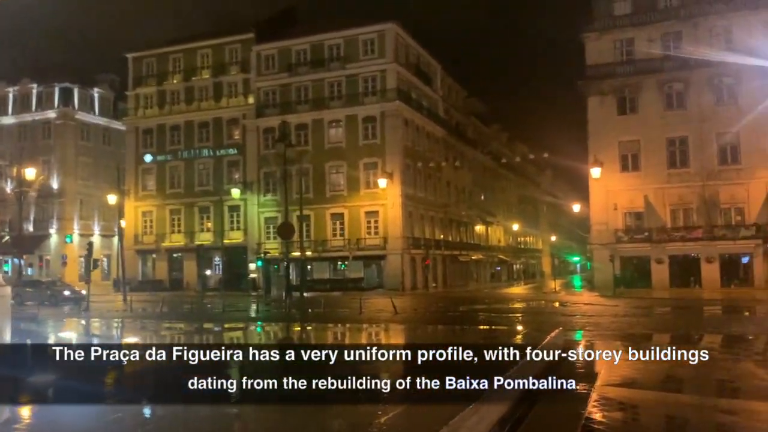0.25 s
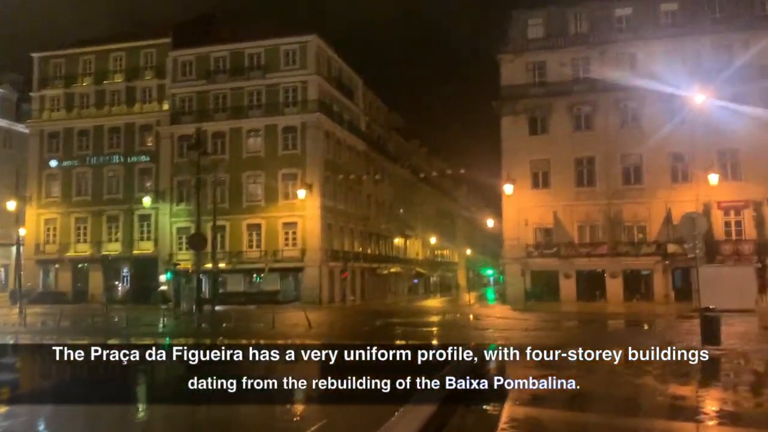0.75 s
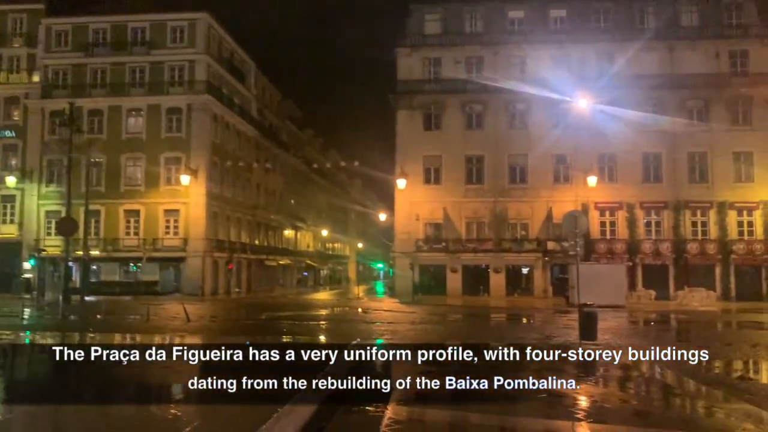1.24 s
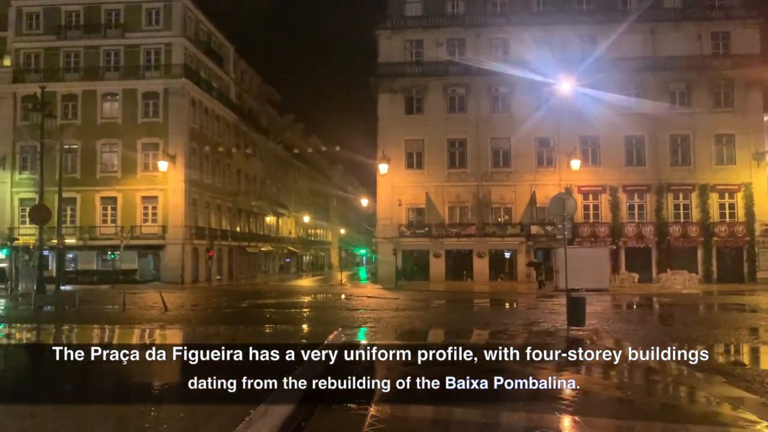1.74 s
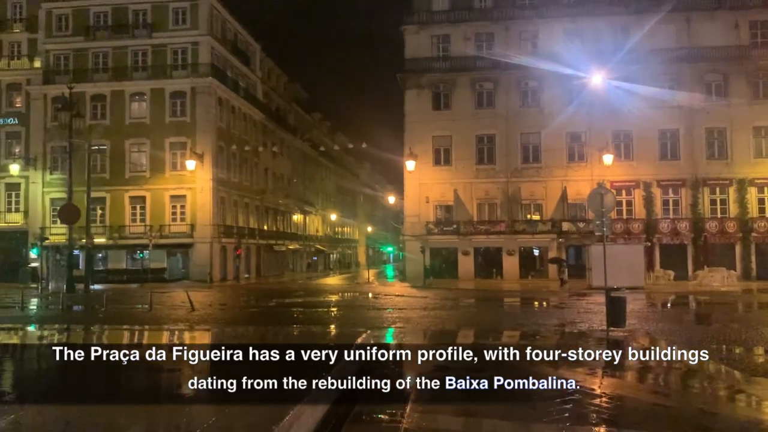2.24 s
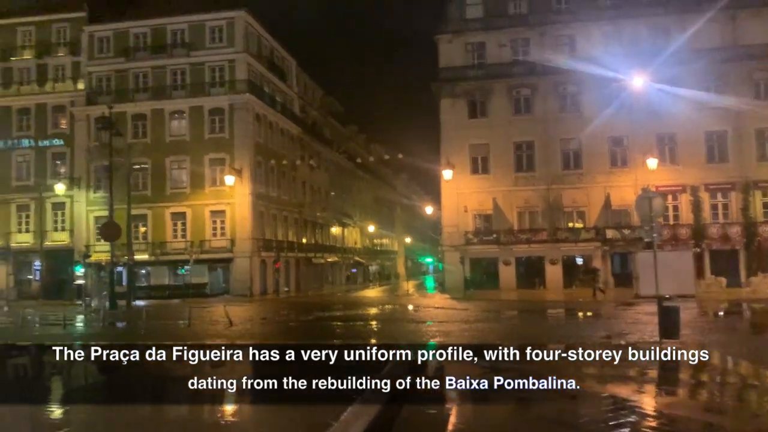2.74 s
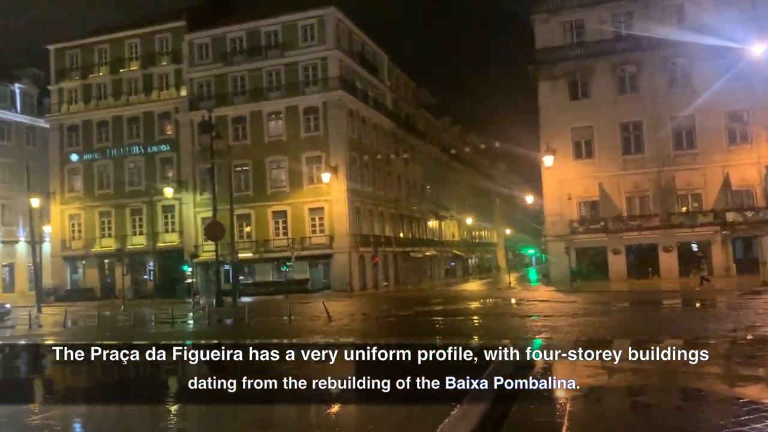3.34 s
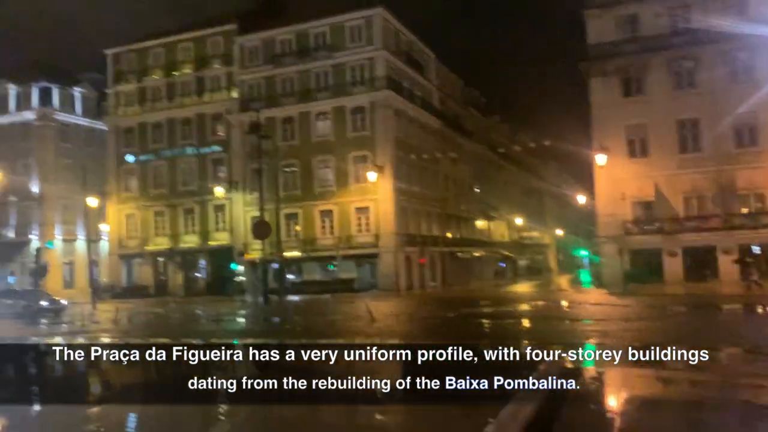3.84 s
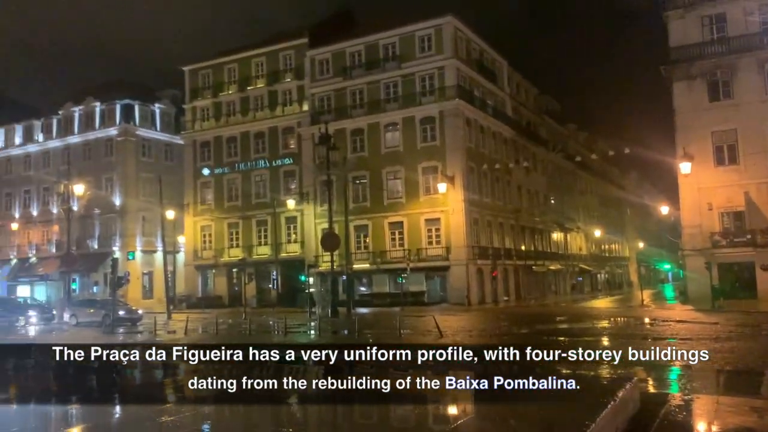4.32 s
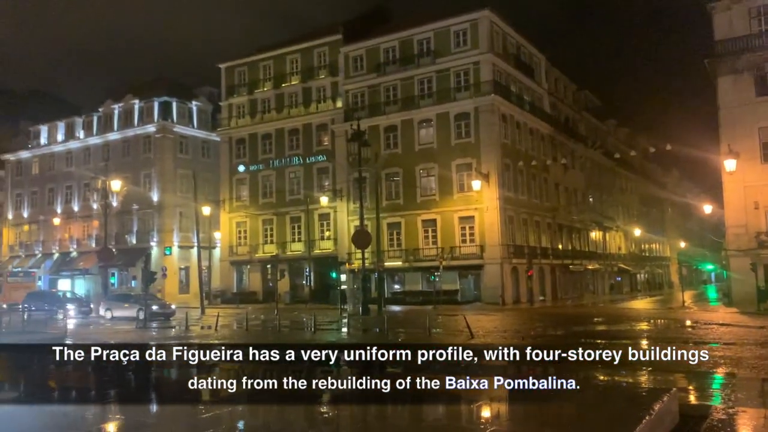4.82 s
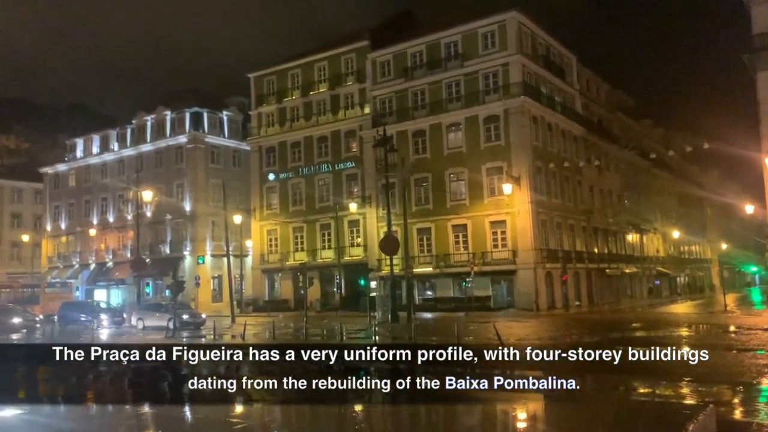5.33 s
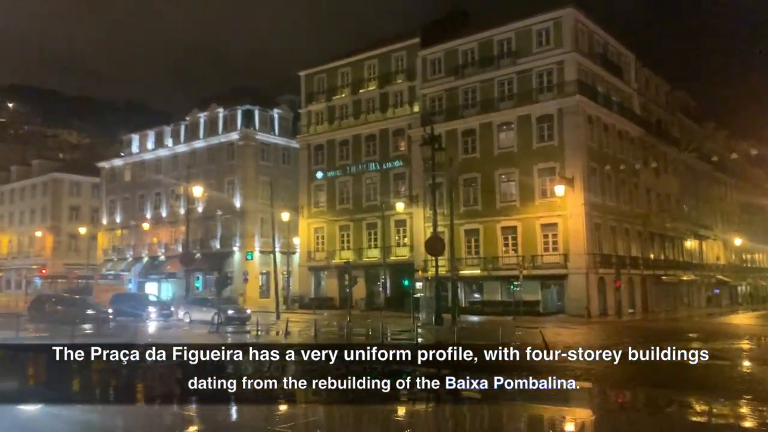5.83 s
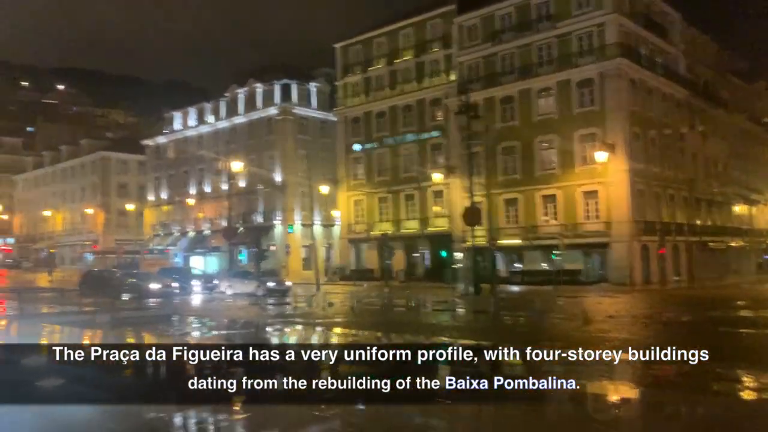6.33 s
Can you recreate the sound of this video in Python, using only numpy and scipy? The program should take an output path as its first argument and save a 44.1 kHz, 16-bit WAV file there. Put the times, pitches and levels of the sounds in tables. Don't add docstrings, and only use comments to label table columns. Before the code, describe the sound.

A wet city square at night, heard through a small handheld stereo microphone in the wind. Low, bassy buffets come in separate uneven pushes: modest in the first second, stronger from about 1.6 to 3.3, easing around 3.5 to 4, then building to the heaviest thumps at 5.3 and 5.8 before falling away. Beneath lies steady, diffuse traffic rumble with soft tyre roar and brief tread hums. A distant heavy engine pulls away, its low drone rising until it fades after 5.5. Wet paving gives an even, quiet hiss, with fizzing spurts densest from 2.6 to 3.3. Tiny bright drops tick throughout, sharpest near 2; dull taps hit the housing at 0.8 and 4.5 and cluster around 6. A very faint motor whine swells between 5 and 6, then a tiny brake squeal at 6.2. Thin electronic hiss and slight noise-suppression speckle remain.

```python
import sys
import numpy as np
from scipy import signal
from scipy.fft import rfft, irfft, next_fast_len
from scipy.io import wavfile
from scipy.ndimage import uniform_filter1d, map_coordinates

SR = 44100
rng = np.random.default_rng(int(sys.argv[2]) if len(sys.argv) > 2 else 0)


def to_wav(s):
    ch = np.atleast_2d(s).T
    pcm = np.round(np.clip(ch, -1, 1) * 32767)
    wavfile.write(sys.argv[1], SR, pcm.astype(np.int16))


def volts_from_decibels(level):
    exponent = np.asarray(level, float) / 20
    return 10 ** exponent


N = 289737

# t/s, engine level/dB, tyre level/dB
TRAFFIC_LEVELS = [(0, -36.5, -45.5), (.3, -34.5, -47), (.8, -35, -44), (1.3, -33, -47.5),
                  (1.75, -34.5, -47), (2.3, -32.5, -47.5), (3, -32, -46.5), (3.6, -34.5, -47.5),
                  (4.3, -33, -45.5), (4.9, -33, -46), (5.5, -33, -45.5), (5.85, -31, -45), (6.15, -34, -46),
                  (6.57, -32, -45.5)]
TYRES_MEAN_DB = -45.5


def unit(x):
    return x / np.sqrt(np.mean(x ** 2) + 1e-20)


def along(points, hz):
    f, v = np.transpose(points)
    return np.interp(np.log(hz + 1), np.log(f + 1), v)


def curves(rows):
    s, *cols = np.transpose(rows)
    return [np.interp(np.arange(N) / SR, s, c) for c in cols]


def wobble(rate):
    knots = rng.standard_normal(int(N * rate / SR) + 4)
    return map_coordinates(knots, [np.arange(N) * rate / SR])


def filtered(x, response):
    m = next_fast_len(x.shape[-1] + 8192)
    spectrum = rfft(x, m) * response(np.fft.rfftfreq(m, 1 / SR))
    return irfft(spectrum, m)[..., :x.shape[-1]]


def band(hz, lo_hz, hi_hz):
    return ((1 + (lo_hz / (hz + 1)) ** 10) * (1 + (hz / hi_hz) ** 10)) ** -.5


def steady(x, size):
    power = np.abs(uniform_filter1d(x ** 2, size))
    return x / np.sqrt(power + 0.16 * np.mean(x ** 2))


def swells(rows, rise_s, fall_s):
    start, length, db = np.transpose(rows)[:3, :, None]
    t = np.arange(N) / SR
    rise = (t - start) / rise_s
    fall = (start + length - t) / fall_s + 1
    return (volts_from_decibels(db) * np.clip(np.minimum(rise, fall), 0, 1)) ** 2


def panned(db):
    return volts_from_decibels(np.array([db / 2, -db / 2]))


def patchy_noise(patchy_db):
    z = signal.stft(rng.standard_normal((2, N)), nperseg=512)[2]
    patches = uniform_filter1d(rng.standard_normal(z.shape[1:]), size=8, axis=0)
    patches = uniform_filter1d(patches, size=6, axis=1)
    return signal.istft(z * volts_from_decibels(patchy_db * unit(patches)), nperseg=512)[1][:, :N]


def at_ports(pair, ports):
    at, alike, lead, pan_db = np.transpose(ports)
    turn = lambda hz: np.arccos(np.clip(np.interp(hz, at, alike), 0, 1)) / 2
    mid, side = filtered(pair, lambda hz: np.array([np.cos(turn(hz)), np.sin(turn(hz))]))
    delay = lambda hz: np.exp(.5j * np.outer([1, -1], np.interp(hz, at, lead)))
    lean = lambda hz: delay(hz) * panned(np.interp(hz, at, pan_db))
    return filtered(np.array([mid + side, mid - side]), lean)


def wind():
    # start/s, length/s, level/dB, flutter (upper rumble over the buffet)/dB
    buffets = [(-0.02, 0.17, -33.5, -1), (0.38, 0.08, -39.5, -3.5), (0.56, 0.19, -33.5, -6),
               (0.826, 0.4, -33.5, 0), (1.116, 0.25, -29.5, -12), (1.446, 0.11, -31, -5.5),
               (1.598, 0.22, -28, -2), (1.79, 0.11, -23.5, -4), (1.896, 0.17, -28.5, -6),
               (2.14, 0.12, -35, -9.5), (2.294, 0.14, -23, -3), (2.454, 0.15, -27.5, -5),
               (2.68, 0.12, -33, -4.5), (2.9, 0.091, -23.5, -3.5), (2.973, 0.21, -28.5, -4),
               (3.203, 0.081, -24, -6), (3.46, 0.31, -32.5, -6), (3.63, 0.083, -35.5, 1.5),
               (3.88, 0.2, -35, -2), (4.193, 0.25, -27.5, -2), (4.487, 0.236, -27, -4),
               (4.783, 0.12, -24.5, -2), (4.94, 0.31, -27.5, -4.5), (5.16, 0.15, -27, -7),
               (5.302, 0.1, -17, 0.5), (5.43, 0.48, -24, -6), (5.79, 0.09, -18.0, 2.5),
               (5.897, 0.15, -24.5, -3.5), (6.103, 0.25, -27.0, -5), (6.38, 0.11, -37, -6)]
    # f/Hz, density/dB per Hz
    eddy_spectrum = [(15, -27), (28, -9.5), (45, 7.5), (65, 13), (100, 7.5), (135, 3), (220, -32),
                     (500, -67), (900, -120)]
    calm_db, calm_flutter_db = -49, -9.5
    power, calm = swells(buffets, rise_s=0.049, fall_s=0.062), volts_from_decibels(calm_db) ** 2
    total = power.sum(axis=0) + calm
    flutter_db = (np.transpose(buffets)[3] @ power + calm_flutter_db * calm) / total
    eddies = filtered(rng.standard_normal((2, N)), lambda hz: volts_from_decibels(along(eddy_spectrum, hz)))
    flutter = filtered(eddies, lambda hz: band(hz, 90, SR))
    shared, own = steady(eddies + (volts_from_decibels(flutter_db) - 1) * flutter, size=2200)
    own = own * volts_from_decibels(-7.5 + 2 * wobble(5))
    pressure = volts_from_decibels(1.0) * np.sqrt(total) * np.array([shared + own, shared - own])
    return filtered(pressure, lambda hz: band(hz, 23, 400))


def street():
    # f/Hz, density/dB per Hz
    street_spectrum = [(20, -27), (40, -5), (70, -6), (110, 3.5), (170, -1), (320, -5), (400, -9),
                       (480, -14), (640, -13), (900, -16.5), (1080, -14), (1180, -15), (1320, -21),
                       (1600, -21.5)]
    # f/Hz, likeness/0-1, left lead/rad, left-right/dB
    low_ports = [(60, .3, 0, 0), (90, .4, 1.5, 0), (130, .9, 1.1, 0), (180, .97, .7, 0), (320, .85, 1.2, 0),
                 (450, .4, 2.7, .5), (780, .68, 2.9, 2), (950, .45, 3, 2), (1080, .4, 2, 1.5),
                 (1250, .35, 3, 1), (1400, .5, 3.2, 0)]
    # start/s, length/s, level/dB
    passes = [(.4, 0.1, -47), (2.6, 0.65, -51), (3.3, 0.28, -47.5), (3.77, .2, -47), (4.1, 0.16, -47.5),
              (4.45, 0.19, -49.5), (4.75, .3, -49), (5.15, 0.26, -44), (5.55, 0.22, -48), (5.9, 0.07, -45),
              (6.25, 0.22, -49)]
    roar_db, tread_db = -40, -46
    roar_grows, tread_grows = 0.45, 2.46
    engines_db, tyres_db = curves(TRAFFIC_LEVELS)
    near_db = tyres_db - TYRES_MEAN_DB
    field = at_ports(patchy_noise(patchy_db=1.8), low_ports)
    field = filtered(field, lambda hz: volts_from_decibels(along(street_spectrum, hz)))
    part = lambda lo_hz, hi_hz: unit(filtered(field, lambda hz: band(hz, lo_hz, hi_hz) ** 2))
    rumble = steady(part(15, 440), size=4000)
    roar, tread = part(410, 950), part(940, 1300)
    passing = swells(passes, rise_s=0.071, fall_s=0.061).sum(axis=0)
    hum = np.sqrt(volts_from_decibels(tread_db + tread_grows * near_db) ** 2 + passing)
    roar_level = volts_from_decibels(roar_db + roar_grows * near_db + wobble(8))
    return volts_from_decibels(engines_db + 4.5) * rumble + roar_level * roar + hum * tread


def bus():
    # t/s, firing rate/Hz, level/dB
    pull_away = [(0, 56, -41.5), (.45, 52.8, -37), (1.25, 54, -38.5), (1.75, 56.5, -43.5),
                 (2.35, 60.5, -35), (3, 65, -38), (4.1, 71.5, -40), (4.45, 75, -44), (5.1, 81, -36.5),
                 (5.5, 83, -46), (6.57, 84, -55)]
    # f/Hz, gain/dB
    exhaust_pipe = [(50, -20), (105, -7.5), (135, 0.5), (165, -0.5), (185, -3), (215, -2), (250, -19.5)]
    lead_rad = .8
    firing_hz, db = curves(pull_away)
    firing_hz = firing_hz + 0.399 * wobble(6)
    turns = 2 * np.pi * np.cumsum(firing_hz) / SR
    lean = np.array([[.5], [-.5]]) * lead_rad
    engine = np.zeros((2, N))
    for multiple in (2, 3):
        strength = volts_from_decibels(along(exhaust_pipe, multiple * firing_hz) + 1.5 * wobble(5))
        engine += strength * np.sin(multiple * turns + lean)
    return volts_from_decibels(db + 3) * engine


def spray():
    # f/Hz, density/dB per Hz
    wet_spectrum = [(1200, 3), (1500, 1), (1800, -1), (2100, -2), (2450, -6.5), (3200, -8), (3700, -8),
                    (4500, -8.5), (5200, -10.5), (6000, -13), (6800, -14.5), (8000, -21), (9200, -35.5),
                    (10500, -62)]
    # f/Hz, likeness/0-1, left lead/rad, left-right/dB
    high_ports = [(1400, .5, 3.3, 0), (1850, .15, 3.6, .5), (2100, .45, 6.1, .5), (2500, .45, 6.4, .5),
                  (2700, .15, 5.6, .5), (3150, .45, 4.2, .5), (3800, .25, 3.2, 1.5), (4500, .25, .5, 1.5),
                  (5500, .3, -2.8, 0), (6900, .35, .4, -1), (7800, .25, 3, -7), (8400, .3, 4.5, -8),
                  (9000, .35, 6.5, -3), (9800, .3, 6.3, 0)]
    # start/s, length/s, level/dB
    puddle_spurts = [(0, .04, -54), (.22, 0.037, -52), (.38, 0.08, -53.5), (.66, 0.069, -54.5),
                     (.97, .04, -54), (1.15, 0.025, -57), (1.97, 0.015, -59), (2.12, 0.11, -56),
                     (2.6, 0.11, -54.5), (2.72, 0.08, -49), (2.83, 0.093, -54), (2.98, 0.12, -51.5),
                     (3.1, 0.085, -49), (3.21, 0.09, -52), (3.54, 0.084, -53), (3.74, 0.054, -54),
                     (4.45, 0.3, -58.5), (4.77, 0.044, -52), (4.9, 0.12, -58.5), (5.25, .13, -58),
                     (5.62, 0.085, -64), (6.0, .5, -57.5)]
    fizz_db, fizz_grows = -52, 0.57
    tyres_db = curves(TRAFFIC_LEVELS)[1]
    field = at_ports(patchy_noise(patchy_db=1.23), high_ports)
    field = filtered(field, lambda hz: volts_from_decibels(along(wet_spectrum, hz)))
    hiss = unit(filtered(field, lambda hz: band(hz, 1262, 3350)))
    fizz = unit(filtered(field, lambda hz: band(hz, 3680, SR)))
    bed = volts_from_decibels(fizz_db + fizz_grows * (tyres_db - TYRES_MEAN_DB))
    spurts = np.sqrt(bed ** 2 + swells(puddle_spurts, rise_s=.02, fall_s=.04).sum(axis=0))
    return volts_from_decibels(tyres_db + 2.5) * hiss + spurts * volts_from_decibels(0.66 * wobble(25)) * fizz


def electronics():
    # f/Hz, density/dB per Hz
    mid_spectrum = [(5000, -35), (8500, 0), (11100, -12), (11500, -36.5), (11700, -45), (11900, -41.5),
                    (12200, -20), (12900, -11.5), (14200, -13), (15100, -24)]
    # f/Hz, density/dB per Hz
    side_spectrum = [(5000, -30), (8500, -6), (9780, -12.5), (11500, -9), (12400, -11.5), (13200, -22)]
    colour = lambda hz: volts_from_decibels([along(mid_spectrum, hz), along(side_spectrum, hz)])
    reach = lambda hz: band(hz, 9300, SR) * [hz < 14600, hz < 13050]
    mid, side = filtered(rng.standard_normal((2, N)), lambda hz: colour(hz) * reach(hz))
    mid, side = volts_from_decibels(-81.5) * unit(mid), volts_from_decibels(-83.5) * unit(side)
    return np.array([mid + side, mid - side])


def ticks():
    # t/s, peak level/dB, left-right/dB, pitch f/Hz
    puddle_drops = [(0.187, -39, -3.5, 4500), (0.6614, -42, -2, 5400), (0.844, -43.5, 1.0, 4510),
                    (1.1314, -51, 0.5, 4790), (1.1717, -42.5, -1, 4790), (1.385, -44.5, -7, 4660),
                    (1.9895, -32.5, -1, 6370), (2.1065, -41, -2, 6800), (2.2308, -42, 0.5, 4670),
                    (2.7756, -40, 2, 4910), (2.8617, -39, -1, 6340), (3.124, -41, 4, 4660),
                    (3.7025, -43.5, 1, 5150), (4.791, -41, -4, 4570), (5.663, -46, -3, 4580)]
    out, t = np.zeros((2, N + 1024)), np.arange(1024) / SR
    envelope = volts_from_decibels(-60 * t / .03) * (1 - np.exp(-t / .0004))
    for s, db, pan_db, pitch_hz in puddle_drops:
        burst = rng.standard_normal((2, len(t))) * envelope
        ring = lambda hz: 1j * hz * 3000 / (pitch_hz ** 2 - hz ** 2 + 1j * hz * 3000)
        burst = filtered(burst, lambda hz: ring(hz) * band(hz, 4000, 8800) ** 3)
        burst = burst / np.abs(burst).max()
        out[:, round(s * SR):][:, :len(t)] += volts_from_decibels(db + 2.5) * panned(pan_db)[:, None] * burst
    return out[:, :N]


def taps():
    # t/s, peak level/dB, left-right/dB, brightest f/Hz
    housing_drops = [(.433, -36, 1, 1100), (.478, -37, 1, 1100), (.805, -27, -1, 1050),
                     (.893, -36, 1, 1200), (2.23, -36, 2, 1100), (2.62, -35, 0, 1300),
                     (3.122, -35, 1, 1100), (3.566, -37, 3, 1000), (4.315, -36, 3, 1000),
                     (4.466, -26, 1, 1100), (5.9665, -30.5, -1, 1500), (5.996, -26, -1, 1800),
                     (6.0345, -22.5, 0, 2600), (6.152, -34, 1, 1200), (6.251, -36, 0, 1100),
                     (6.455, -29.5, -1, 800), (6.49, -31, 0, 800)]
    out = np.zeros((2, N + 2048))
    blow = np.eye(1, 2048, 64)[0]
    bend = lambda hz: np.exp(-2j * np.pi * 1.3 * (np.log(hz + 60) - hz / 6000))
    for s, db, pan_db, top_hz in housing_drops:
        colour = lambda hz: band(hz, 230, top_hz) * volts_from_decibels(-11 * np.log2(hz / 700 + .6))
        tap = filtered(blow, lambda hz: bend(hz) * colour(hz))
        tap = tap / np.abs(tap).max()
        out[:, round(s * SR) - 64:][:, :2048] += volts_from_decibels(db + 4) * np.outer(panned(pan_db), tap)
    return out[:, :N]


def whines():
    # start/s, length/s, f/Hz, level/dB, wander/Hz, right port sign
    far_tones = [
        (3.665, .15, 13430, -81, 5, 1),
        (3.6, .24, 13430, -90, 5, 1),
        (3.7, .085, 13600, -87, 5, 1),
        (6.215, .065, 5200, -54, 30, -1),
        (5, 1, 435, -47, 8, -1),
        (5, 1, 1120, -53, 8, -1),
    ]
    out, t = np.zeros((2, N)), np.arange(N) / SR
    wander, waver = wobble(27), wobble(12)
    for start, length, hz, db, wander_hz, sign in far_tones:
        on = slice(int(start * SR), int((start + length) * SR))
        swell = np.abs(np.sin(np.pi * (t[on] - start) / length)) ** 2.2
        phase = 2 * np.pi * np.cumsum(hz + wander_hz * wander[on]) / SR
        out[:, on] += np.outer([1, sign], volts_from_decibels(db + 3 * waver[on]) * swell * np.sin(phase))
    return out


def scene():
    return wind() + street() + bus() + spray() + electronics() + ticks() + taps() + whines()


def suppressed(x):
    # f/Hz, expansion power
    speckle = [(100, .05), (300, .2), (600, .33), (4000, .3), (7500, .35), (9500, 1), (14000, 1)]
    hz, _, z = signal.stft([x[0] + x[1], x[0] - x[1]], SR, nperseg=1536)
    size = np.abs(z)
    over = size / (np.abs(uniform_filter1d(size, size=21, axis=1)) + 1e-12)
    expansion = np.clip(along(speckle, hz), 0, 1)[:, None]
    mid, side = signal.istft(z * over ** expansion, SR, nperseg=1536)[1][:, :N] / 2
    return np.array([mid + side, mid - side])


def low_pass(x):
    return signal.sosfilt(signal.butter(12, 14900, fs=SR, output="sos"), x)


def record(dry):
    x = suppressed(dry)
    x = x / (1 + np.abs(x / .64) ** 5) ** (1 / 5)
    return low_pass(x)


dry = scene()
out = record(dry)
to_wav(out)
```